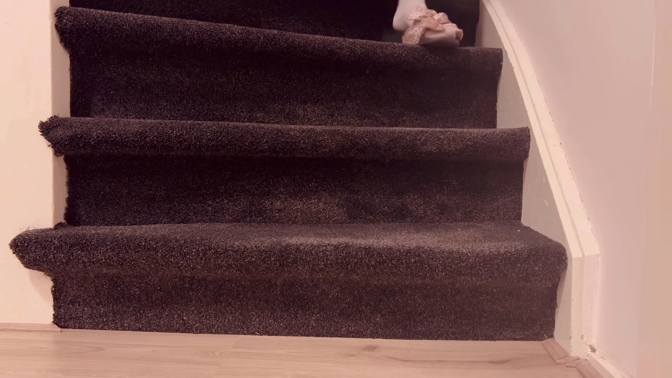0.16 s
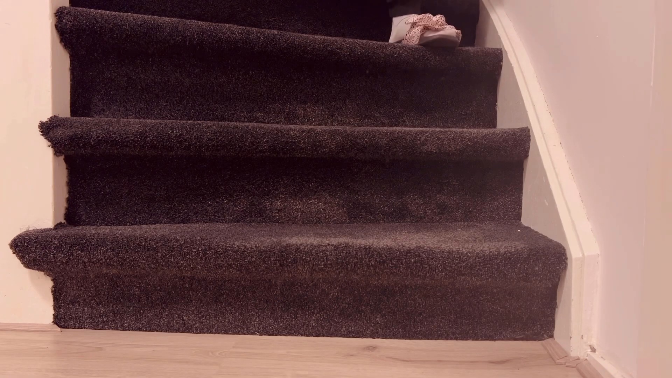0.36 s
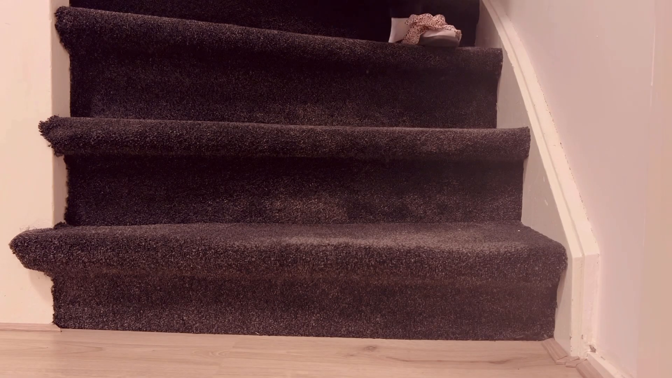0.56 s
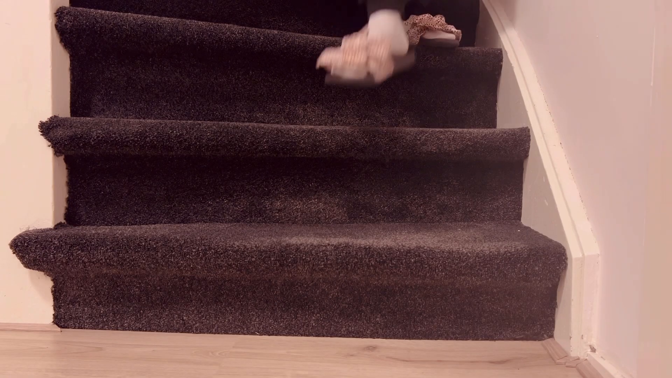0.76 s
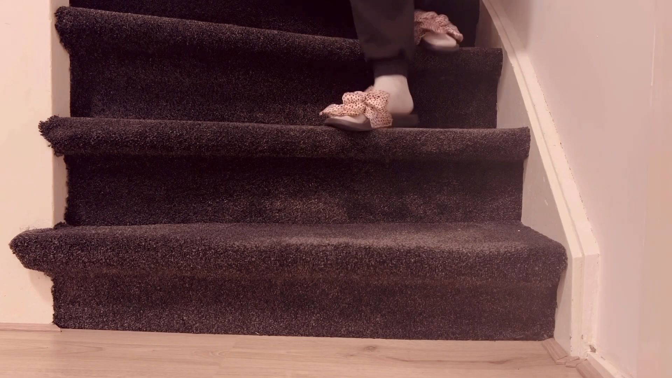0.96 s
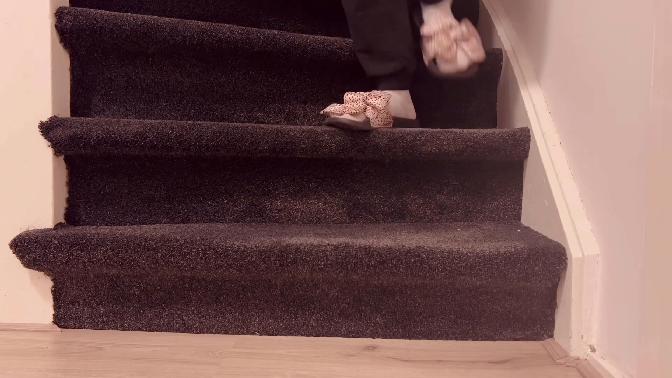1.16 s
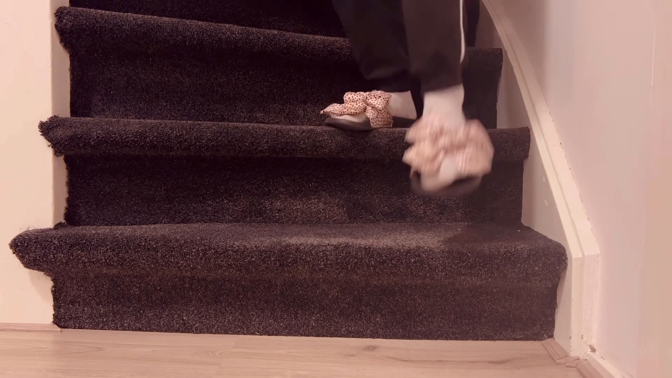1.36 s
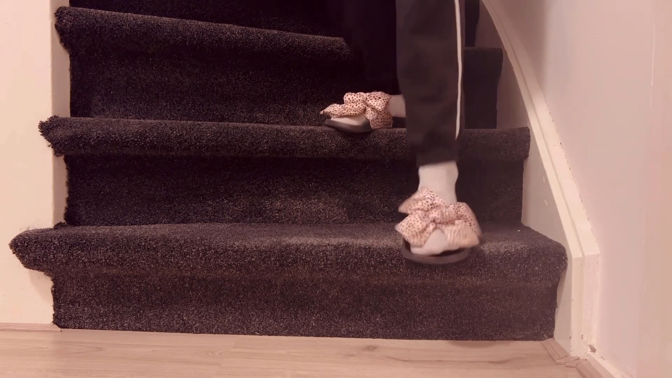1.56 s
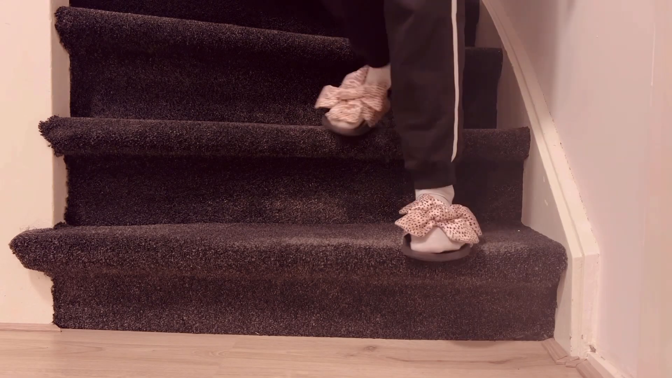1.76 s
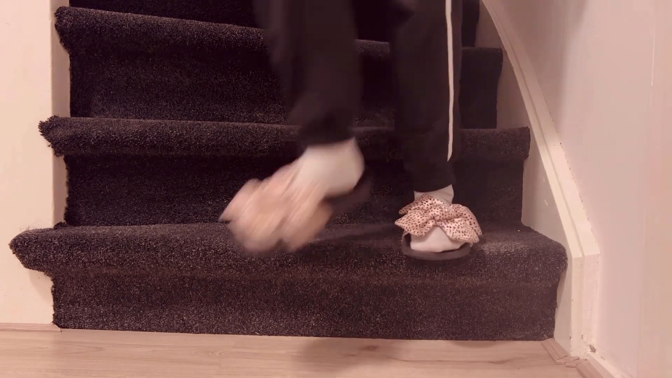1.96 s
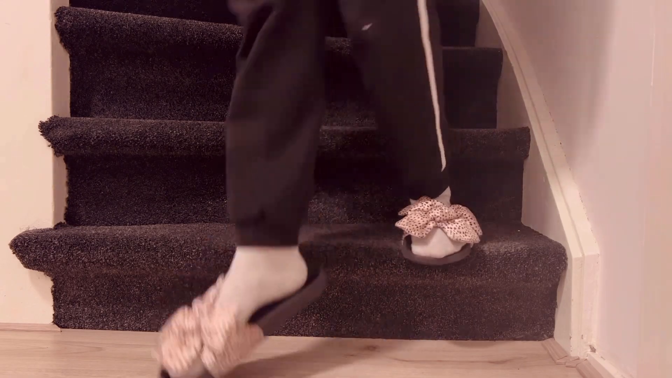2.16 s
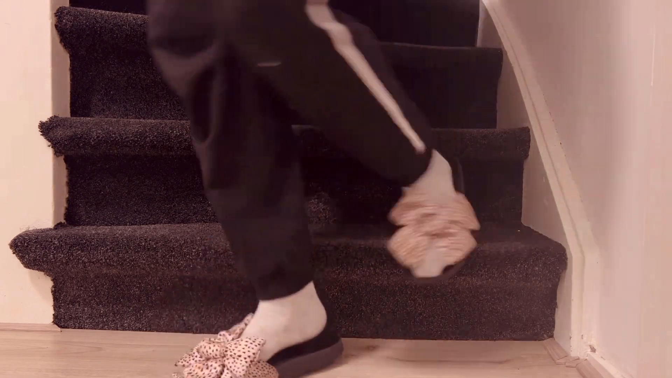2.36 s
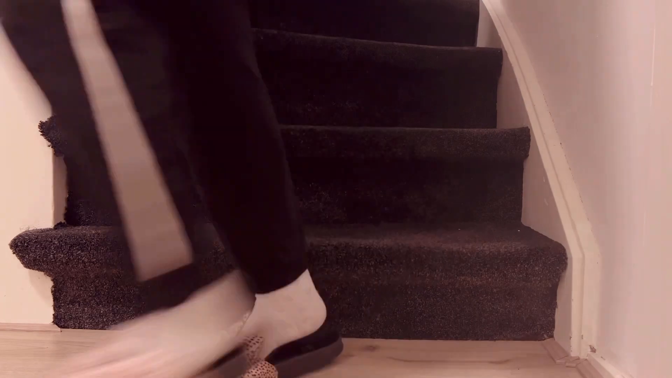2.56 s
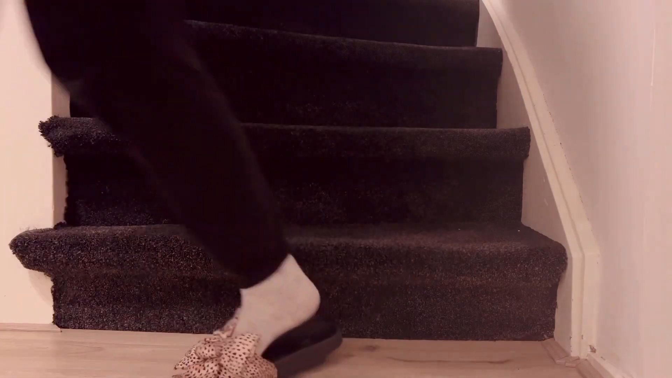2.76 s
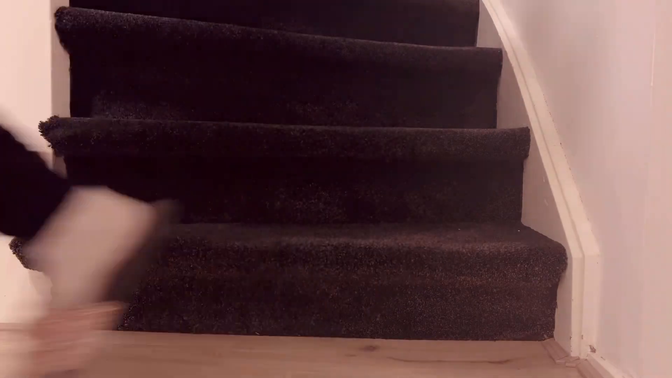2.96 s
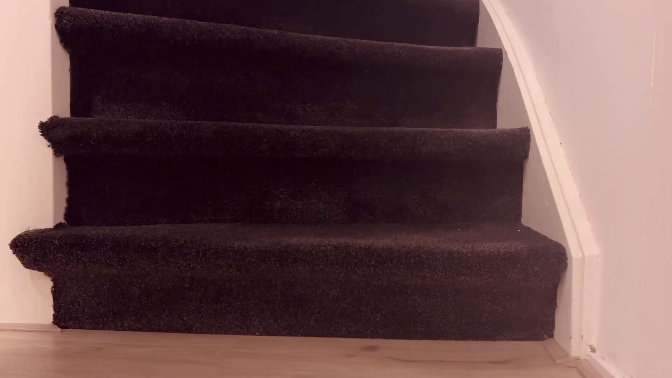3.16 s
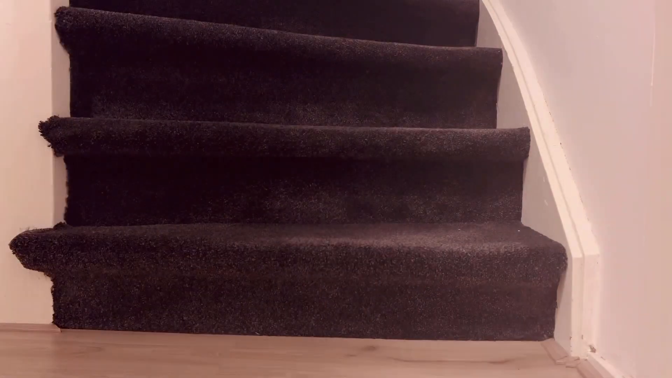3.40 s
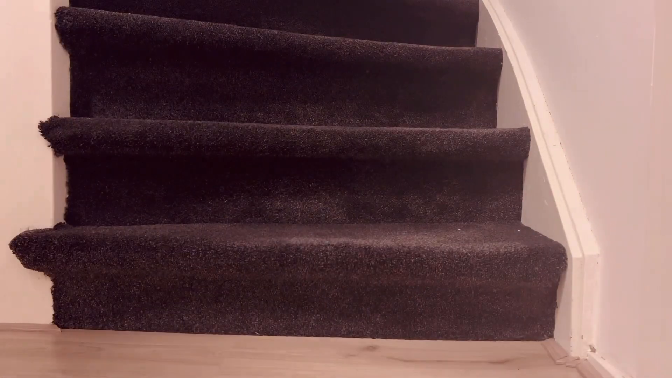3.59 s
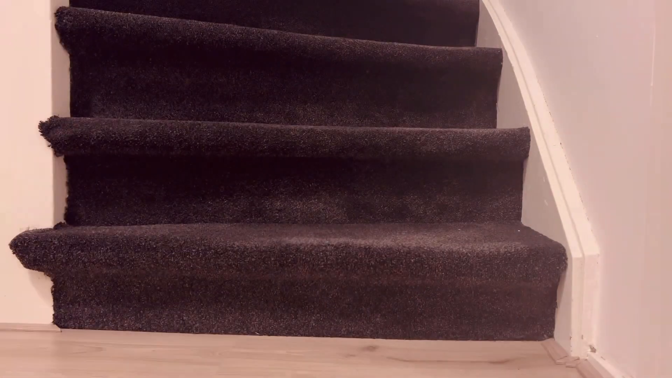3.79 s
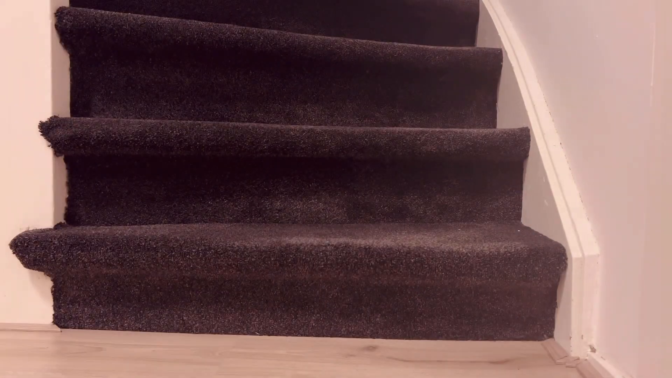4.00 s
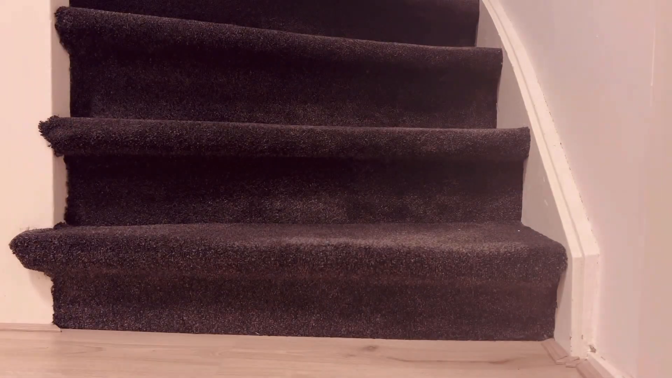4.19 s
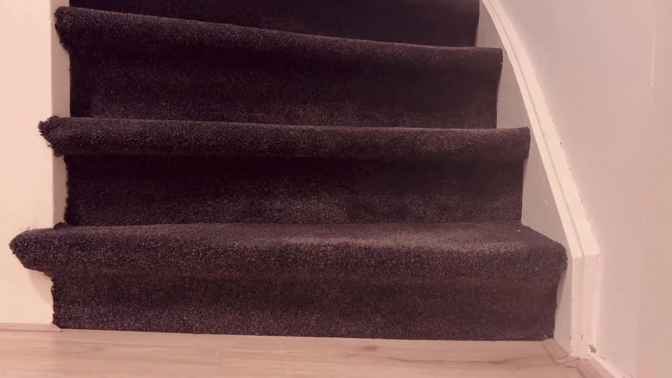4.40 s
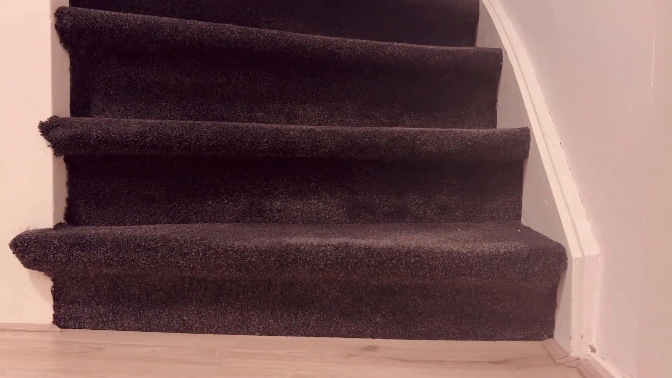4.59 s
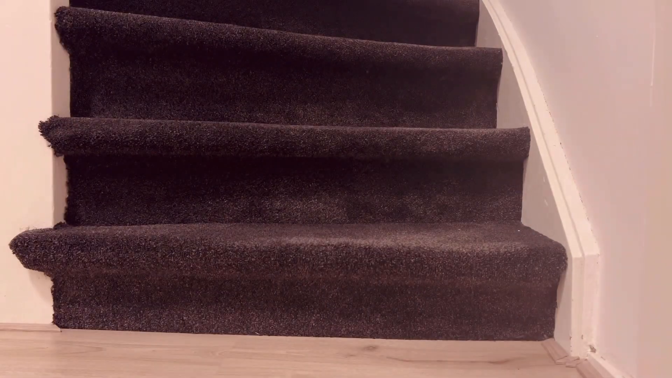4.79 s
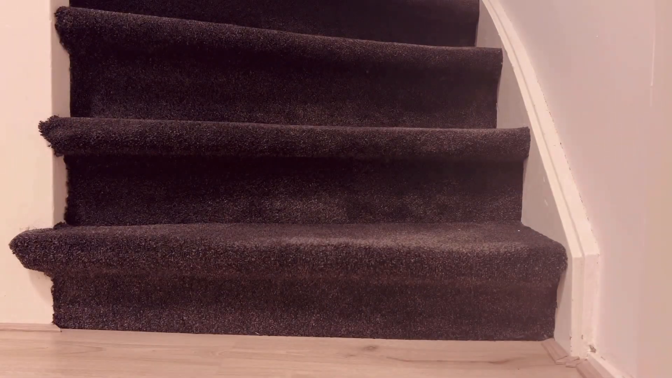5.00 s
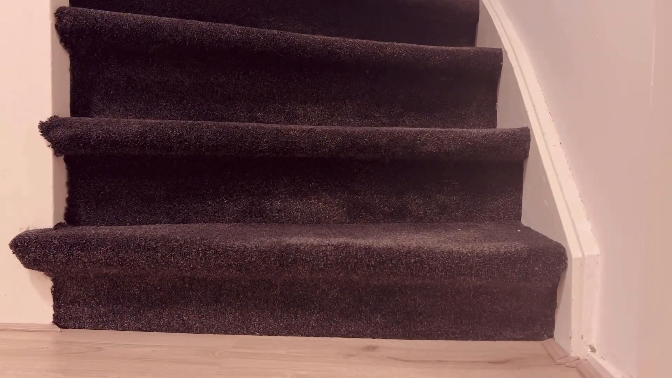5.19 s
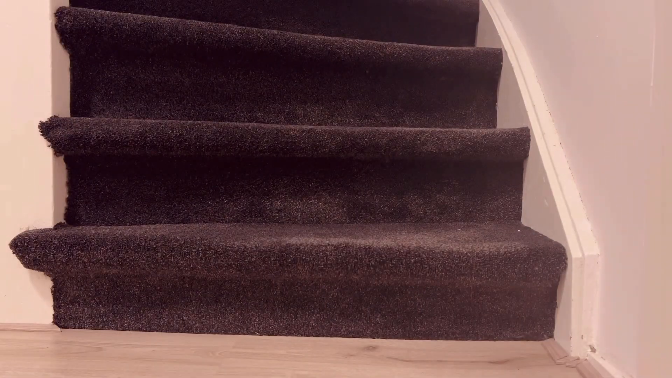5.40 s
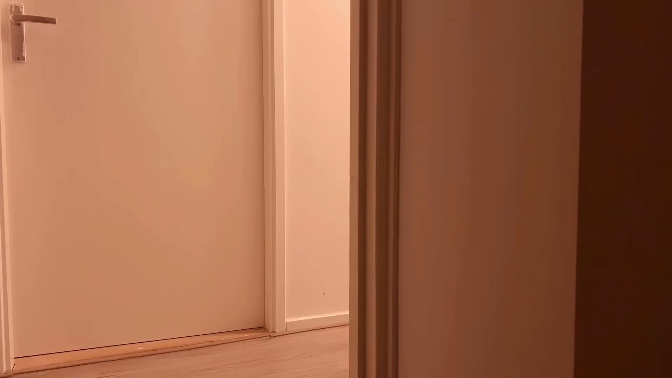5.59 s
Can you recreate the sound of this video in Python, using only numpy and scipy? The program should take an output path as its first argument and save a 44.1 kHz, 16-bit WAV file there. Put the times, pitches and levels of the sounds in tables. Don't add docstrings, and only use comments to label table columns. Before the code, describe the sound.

Dull booming steps descend a carpeted wooden staircase, followed by a sharp landing on bare boards and quieter footsteps receding down a hall.

```python
import sys
import numpy as np
from scipy import signal
from scipy.fft import rfft, irfft, next_fast_len
from scipy.io import wavfile
from scipy.ndimage import uniform_filter1d, map_coordinates

SR = 44100
rng = np.random.default_rng(int(sys.argv[2]) if len(sys.argv) > 2 else 0)


def invert_db(level):
    return 10 ** (np.asarray(level, dtype=float) / 20)


def waveform_to_disk(signal):
    frames = np.transpose(np.atleast_2d(signal))
    scaled = np.clip(frames, -1, 1) * 32767
    samples = np.round(scaled).astype(np.int16)
    wavfile.write(sys.argv[1], SR, samples)


N = 249149
LONG = next_fast_len(N, True)
PORT_LAG = 2


def rms_one(x):
    return x / np.sqrt(np.mean(x ** 2) + 1e-20)


def at_hz(points, hz):
    table = np.array(points)
    return np.interp(np.log(np.maximum(hz, 1)), np.log(table[:, 0]), table[:, 1])


def coloured(x, gain_db):
    return irfft(rfft(x) * invert_db(gain_db), x.shape[-1])


def stereo_noise(size):
    # hz, left-right likeness
    coherence = [(60, 0.95), (120, 0.98), (180, 0.84), (300, 0.81), (600, 0.18), (2000, 0.1), (5000, 0.33),
                 (10000, 0.056)]
    hz = np.fft.rfftfreq(size, 1 / SR)
    mid, side = rfft(rng.standard_normal((2, size)))
    alike = np.clip(at_hz(coherence, hz), 0, 1)
    return hz, np.sqrt(1 + alike) * mid + np.sqrt(1 - alike) * side * [[1], [-1]]


def panned(db):
    return invert_db(np.array([db / 2, -db / 2]))


def add(out, piece, s):
    at = int(s * SR)
    out[:, at:at + piece.shape[1]] += piece[:, :N - at]


def room_tone():
    # hz, level_db per Hz
    air_spectrum = [(15, -32), (25, -4), (53, 1.5), (75, -12.5), (107, -2.5), (167, -14.5), (237, -11.5),
                    (305, -25), (425, -21.5), (1100, -35.5), (1430, -64.5), (2420, -120)]
    # hz, level_db per Hz
    mic_spectrum = [(650, -32.5), (1100, -15), (1190, -8.5), (1330, -5.5), (1950, 0), (2230, 1),
                    (2700, -6.5), (3370, -5), (3570, -6), (3900, -8), (6750, -8), (8360, -8), (9500, -8.5),
                    (10100, -14), (11000, -18), (13000, -19), (13700, -22), (15300, -19.5), (15900, -39.5)]
    # hz, left_right_db
    mic_balance = [(1000, 0.5), (1400, 2.5), (2000, 7), (3500, 4.5), (4600, 2), (6000, -0.5)]
    # hz, rms_db
    mains = [(49.5, -76), (100, -75)]
    hz, spectra = stereo_noise(LONG)
    air = irfft(spectra * invert_db(at_hz(air_spectrum, hz)), LONG)[:, :N]
    mic = irfft(spectra * invert_db(at_hz(mic_spectrum, hz)), LONG)[:, :N]
    mic = irfft(rfft(mic, LONG) * panned(at_hz(mic_balance, hz)), LONG)[:, :N]
    t = np.arange(N) / SR
    hum = sum(invert_db(db) * np.sqrt(2) * np.sin(2 * np.pi * f * t) for f, db in mains)
    air = invert_db(-67.5) * air / np.std(air.mean(0))
    mic = invert_db(-83.5) * mic / np.std(mic.mean(0))
    return air + mic + hum


def booms():
    # start_s, peak_db, boom_hz, t60_s
    tread_loads = [(.03, -51, 86.7, 0.31), (.147, -28, 101.2, 0.11), (.2, -36.5, 109, 0.1),
                   (.261, -38, 62.3, 0.24), (.309, -44.5, 72.9, 0.26), (.382, -39, 74.5, 0.057),
                   (.45, -65, 58, 0.15), (.512, -43, 104.3, 0.088), (.6, -62, 65.4, 1),
                   (.726, -39.5, 82.5, 0.087), (.769, -40, 79.5, 0.049), (.857, -33.5, 102.9, 0.19),
                   (.92, -40, 65, 0.13), (.968, -44.5, 112.6, 0.14), (1.038, -47.5, 99, 0.29),
                   (1.079, -46.5, 81.6, 0.068), (1.128, -60, 61.5, 0.054), (1.423, -54, 101, 0.11),
                   (1.498, -52.5, 108.4, 0.62), (1.544, -27.5, 108.4, 0.18), (1.565, -23, 106.5, 0.28),
                   (1.637, -33, 76.8, 0.17), (1.687, -45, 80, 0.079), (1.743, -39.5, 70.8, 0.2),
                   (1.779, -48.5, 72, 0.19), (1.827, -46.5, 103.4, 0.13), (1.95, -61, 64.6, 0.19)]
    # start_s, peak_db, boom_hz, t60_s
    joist_loads = [(2.108, -61, 65, 0.083), (2.201, -44.5, 91.7, 0.49), (2.25, -53, 102, 0.17),
                   (2.319, -43.5, 123.5, 0.096), (2.711, -51, 123, 0.16), (2.752, -34, 80.4, 0.087),
                   (2.799, -50, 75, 0.21), (2.866, -49.5, 110, 0.13), (2.95, -59, 89, 0.61),
                   (3.31, -46.5, 61.5, 0.092), (3.408, -52, 60, 0.2), (3.487, -60, 103, 0.38),
                   (3.552, -56, 60.3, 0.2), (3.888, -55, 75.6, 0.12), (4.037, -57, 63.3, 0.2),
                   (4.23, -58, 81.4, 0.062), (4.39, -57.5, 86, 0.34), (4.432, -47, 90.5, 0.18),
                   (4.498, -57, 74, 0.47), (4.995, -55.5, 101.7, 0.29), (5.307, -55.5, 86.3, 0.4)]
    stairwell_hz, stairwell_t60_s = 49.58, 0.81
    settle_s, sways_per_s = 0.0072, 40
    rate = SR // 10
    out = np.zeros(N // 10 + rate)
    t = np.arange(rate // 2) / rate
    loads = tread_loads + joist_loads
    sway = rng.standard_normal((len(loads), 3, 40))

    def slow(v):
        return map_coordinates(v, [t * sways_per_s], order=3, mode="mirror")

    rise = (1 - np.exp(-t / settle_s)) * np.clip(10 * (.5 - t), 0, 1)
    for (s, db, hz, t60), (wobble, swell, other) in zip(loads, sway):
        air_db = -57 + (db + 45) - db
        shape = rise * invert_db(-60 * t / t60)
        phase = 2 * np.pi * hz * t + 0.55 * (slow(wobble) - wobble[0])
        tread = np.sin(phase) * invert_db(1.6 * slow(swell))
        tread += invert_db(-15.5 + 6.5 * np.clip(slow(other), -2, 1)) * np.sin(1.8 * phase)
        air = invert_db(air_db - 60 * t / stairwell_t60_s) * rise
        air = air * np.sin(2 * np.pi * stairwell_hz * t + 1.3 * slow(other))
        at = int(s * rate)
        out[at:at + len(t)] += invert_db(db) * (shape / shape.max() * tread + air)
    return np.tile(signal.resample_poly(out, 10, 1)[:N], (2, 1))


def scuff():
    # start_s, fall_20db_s, hiss_db, rub_re_hiss_db,
    # brightness_db
    skids = [(0.141, 0.15, -77, 7.5, -3.5), (0.718, 0.11, -74, -10, 0), (0.859, 0.33, -83, 7, -2),
             (1.438, 0.08, -68, 0, 0), (1.538, 0.4, -79.5, 7, 0), (1.657, -0.23, -72.5, -8, 7.5),
             (2.096, 0.32, -80.5, 13.5, 0), (2.202, 0.1043, -49.5, -6, 4), (2.232, 0.21, -72.5, -2, 2),
             (2.706, 0.18, -76, 11.5, -2), (3.271, 0.19, -83, 10, -5), (3.855, 0.15, -79, 8, -7),
             (3.965, 0, -76, 14, 0), (3.998, -0.12, -75.5, 10.5, 14), (4.989, 0.23, -76.5, -2, -4),
             (4.49, 0.25, -84, 5.5, -4), (5.12, 0.15, -90.5, 6.5, -3), (0.385, 0.02, -86, 7, -4)]
    # peak_s, fall_20db_s, hiss_db, rub_re_hiss_db, brightness_db
    flicks = [(0.379, 0.0551, -66.5, -9, 8), (.511, -0.13, -79, 2.5, -1), (0.898, 0.3, -79.5, -4, 0.5),
              (1.063, 0.03, -64, -4, 5.5), (1.749, -0.04, -66, -13, 3), (1.761, 0.03, -59.5, -9, 1),
              (1.788, 0.34, -81.5, -4.5, -2), (2.355, 0.06, -67, -0.5, 3), (2.775, 0.107, -56, -2, -3),
              (2.814, 0.2, -72.5, -5.5, 0.5), (4.028, 0, -61.5, -5.5, 10.5),
              (4.389, 0.25, -76, -24.5, -2.5), (4.41, 0.14, -70, -13, -9), (4.45, 0.1, -61, -11.5, -5.5)]
    # peak_s, rise_12db_s, fall_20db_s, hiss_db, brightness_db
    drags = [
        (2.75, 0.08, 0.13, -73.5, 0),
        (3.31, 0.06, 0.8, -81.5, -1.5),
        (3.39, 0.2, 0.15, -78.5, -3),
        (3.495, 0.2, 0.07, -76.5, 0),
        (3.95, 0.06, 0.15, -76, -1),
        (4.06, -0.06, 0, -81, -2),
        (4.559, 0.02, -0.06, -73, -1.5),
        (4.599, 0, -0.04, -72, 3),
        (5.3, 0.04, -0.03, -77, -7),
    ]
    # hz, level_db per Hz
    hiss_spectrum = [(1410, -43.5), (2400, -5), (4320, 0), (7830, -2), (9110, -3), (10400, -18.5),
                     (12500, -32), (13900, -30), (14900, -25), (15700, -24), (15900, -62.5)]
    # time_s, level_db
    low_edge = [(0, 5), (2.0, -1), (3.0, 2), (4.1, 0.5), (4.35, -6.5), (4.5, -2.5), (4.7, -1), (5.6, -14)]
    dulling, rub_lingers = 0.12, 0.12
    time, gains = np.arange(LONG) / SR, np.zeros((3, LONG))
    strokes = [(s, 0.0044, fall, db, rub, tilt) for s, fall, db, rub, tilt in skids]
    strokes += [(s, 0.015, fall, db, rub, tilt) for s, fall, db, rub, tilt in flicks]
    strokes += [(s, rise, fall, db, -2.5, tilt) for s, rise, fall, db, tilt in drags]
    for s, rise, fall, db, rub_db, tilt_db in strokes:
        rise, fall = max(rise, .002), max(fall, .015)
        near = slice(max(int((s - 3 * rise) * SR), 0), int((s + 3 * fall) * SR))
        below = np.maximum(12 * (s - time[near]) / rise, 20 * (time[near] - s) / fall)
        tilt = tilt_db - dulling * below
        gains[:, near] += invert_db(db - below + np.array([-tilt / 2, tilt / 2, rub_db + rub_lingers * below]))

    slips = np.minimum(rng.exponential(1, LONG // 60 + 1), 3)
    clumps = rms_one(uniform_filter1d(slips - 1, size=9))
    grains = invert_db(np.repeat(1.5 * slips + .9 * clumps, 60)[:LONG])
    hz, spectra = stereo_noise(LONG)
    noise = irfft(spectra, LONG) * grains
    hiss = rms_one(coloured(noise, at_hz(hiss_spectrum, hz) - 40 * (hz < 2400)))
    upper = coloured(hiss, -40. * (hz < 6300))
    lowest = coloured(hiss, -40. * np.clip((hz - 3300) / 2500, 0, 1))
    middle = hiss - upper - lowest * (1 - invert_db(np.interp(time, *np.transpose(low_edge))))
    rub_band = signal.butter(2, [650, 2500], "band", fs=SR, output="sos")
    rub = rms_one(signal.sosfilt(rub_band, noise[::-1, ::-1]))
    mix = gains[0] * middle + gains[1] * upper + gains[2] * rub
    return (panned(1.5)[:, None] * mix)[:, :N]


def wood(modes, luck, t, scale, rise, spread, pan_db, loudest_hz=None, focus_db=13):
    hz, db, t60 = np.tile(np.transpose(modes), 3)
    strength, detune, turn, phase = luck[:, :len(hz)]
    if loudest_hz:
        db = db - focus_db * np.log2(hz / loudest_hz) ** 2
    sign = np.tile((-1.) ** np.arange(len(modes)), 3)
    step = np.exp((2j * np.pi * hz * (1 + 0.058 * detune) - np.log(1000) / (t60 * scale)) / SR)
    rings = np.cumprod(np.broadcast_to(step, (len(t), len(hz))), axis=0)
    aimed = np.clip(hz / 280, 0, 1) ** 3
    angle = .5 * phase + np.outer([1, -1], aimed * spread * turn)
    start = sign * invert_db(db + 2.0 * strength) * np.exp(1j * angle) * panned(pan_db * aimed)
    both = (start @ rings.T).imag * (1 - np.exp(-t / rise)) ** 2
    return both / np.abs(both.mean(0)).max()


def knocks():
    # mode_hz, level_db, t60_s
    lower_wood = [(147, -12, 0.018), (190, -7, 0.09), (205, 2.5, 0.087), (231, 2, 0.072),
                  (272.8, -1.5, 0.13), (309.2, -0.5, 0.056), (341.1, 4, 0.054), (368, 1.5, 0.07),
                  (406, -8.5, 0.092), (440.5, -9.5, 0.048)]
    middle_wood = [(486, 1.5, 0.094), (540.7, -2, 0.042), (575, 10, 0.031), (624, 1, 0.065),
                   (705.3, -0.5, 0.095), (763, 2, 0.033), (814, -5, 0.036)]
    upper_wood = [(950, 9.5, 0.011), (920, 1.5, 0.0081), (1067, 3.5, 0.015), (1400, -11, 0.0096),
                  (1359, 8, 0.013), (1393, 10.5, 0.012), (1588, -16.5, .02), (1760, -3, 0.037),
                  (2000, -4.5, 0.014), (2330, -9, 0.02)]
    # start_s, peak_db, hardness_db, board_hz, ring_scale
    tread_contacts = [(.145, -34, -32.5, 198, 1.26), (.199, -45, -24, 156, 1.6),
                      (.388, -52, -13.5, 152, 1.7), (.409, -49, -11.5, 216, 1.23),
                      (.518, -48.5, -27.5, 220, 1.3), (.549, -66, -31, 240, 1.4),
                      (.735, -45.5, -27, 232, 0.66), (.777, -49, -28, 222, 0.3),
                      (.862, -35.5, -52, 186, 0.5), (.923, -54.5, -7, 190, 0.75),
                      (.946, -43.5, -49, 271, 0.76), (1.048, -48.5, -40.5, 151, 0.48),
                      (1.071, -50.5, -16.5, 171, 1.3), (1.439, -48, -25, 154, 0.42),
                      (1.459, -56.5, -18, 205, 18), (1.538, -36.5, -42, 266, 0.76),
                      (1.569, -42.5, -25, 153.5, 3), (1.612, -41, -36, 325, 0.66),
                      (1.659, -46, -33, 149, 1), (1.763, -46.5, -15.5, 354, 0.96),
                      (1.798, -64, -3, 151, 0.81)]
    # start_s, peak_db, hardness_db, board_hz, ring_scale
    landing_contacts = [(2.095, -45, -17, 374, 0.93), (2.101, -62, -11, 372, 0.68),
                        (2.126, -58.5, 7, 411, 0.83), (2.197, -25.5, 1, 433, 0.63),
                        (2.203, -24, -32, 360, 0.85), (2.238, -49.5, -13, 396, 3.7),
                        (2.319, -41, -10, 146, 0.81), (2.707, -30, -28, 316, 0.59),
                        (2.718, -40, -12, 372.5, 0.35), (2.752, -36.5, -8.5, 332, 1.22),
                        (2.76, -45, 3.5, 217, 0.62), (2.778, -46, -14, 209, 0.85),
                        (2.8, -47, 1.5, 147, 1.5), (2.872, -47, -19, 201, 0.46)]
    # start_s, peak_db, hardness_db, board_hz, ring_scale
    hallway_contacts = [(3.27, -38.5, -23, 246, 0.58), (3.309, -44.5, -15, 269, 0.49),
                        (3.358, -53, -16.5, 256, 1.7), (3.457, -47.5, -23.5, 198, 0.38),
                        (3.49, -56, -4.5, 182, 0.46), (3.853, -42.5, -23, 356, 1.3),
                        (3.889, -52, -7.5, 383, 1.14), (3.918, -53.5, -11, 327, 2.2),
                        (3.968, -56.5, -2, 315, 2.4), (4.377, -50, -22, 247, 0.87),
                        (4.402, -63, -12, 352, 2.1), (4.444, -58.5, -5, 353, 1.9),
                        (4.49, -59, -15, 313, 0.52), (4.986, -51.5, -0.5, 297, 1.03),
                        (5.019, -53, -2.5, 400, 0.91), (5.148, -65.5, -15, 226.5, 1),
                        (5.302, -50.5, -24, 230, 0.4), (5.318, -53, -25.5, 380, 0.75),
                        (5.518, -74, -7, 235, 1.9), (5.613, -73, -21, 231, 0.57)]
    # start_s, peak_db, hardness_db, board_hz, ring_scale
    toe_contacts = [(.145, -47, -16.5, 400, 0.57), (.722, -53, -19, 200, 0.95), (0.861, -73, -6, 400, 0.8),
                    (.935, -70, -3, 400, 1.9), (1.433, -62, -5, 400, 0.71), (1.537, -52, -9, 400, 0.49),
                    (1.565, -58, 4, 401, 0.39), (1.768, -54.5, 2, 396, 0.94), (2.704, -48, 2, 399, 0.41),
                    (3.267, -51.5, -6, 395, 0.61), (3.852, -60, -11, 399, .5), (4.374, -69, -14, 400, 0.62)]
    out, t = np.zeros((2, N)), np.arange(SR // 7) / SR
    contacts = tread_contacts + landing_contacts + hallway_contacts + toe_contacts
    luck = rng.standard_normal((len(contacts), 3, 4, 30))
    for (s, db, upper_db, board_hz, scale), (low, middle, high) in zip(contacts, luck):
        middle_db = -1 + 0.52 * upper_db + 1.5 * np.log2(board_hz / 230)
        rise = 0.00046 * invert_db(-.2 * upper_db - 0.25 * (db + 27))
        body = wood(lower_wood, low, t, scale, rise, spread=0.42, pan_db=-4.0, loudest_hz=board_hz)
        body += invert_db(middle_db) * wood(middle_wood, middle, t, scale, rise, spread=0.56, pan_db=2.0)
        body += invert_db(upper_db) * wood(upper_wood, high, t, scale, rise, spread=0.33, pan_db=1.5)
        add(out, invert_db(db) * body, s)
    return out


def causal(gain_db):
    cepstrum = irfft(gain_db * np.log(10) / 20)
    half = len(cepstrum) // 2
    cepstrum[1:half] *= 2
    cepstrum[half + 1:] = 0
    return np.exp(rfft(cepstrum))


def slaps():
    # start_s, peak_db, loudest_hz, left_right_db
    smacks = [(0.145, -71, 2860, -2), (1.4349, -56.5, 8640, -2), (1.537, -72, 2330, 4),
              (2.102, -63.5, 2319, -3), (2.1225, -63.5, 8500, 2.5), (2.1956, -34.5, 6130, 1.5),
              (2.7052, -67, 2240, -4), (2.752, -37, 4240, 3), (2.756, -42, 6400, 3), (2.7652, -43, 7400, 4),
              (2.778, -53.5, 2500, 7), (2.801, -67, 1940, 3), (0.895, -63, 8100, -1), (0.723, -76, 7800, 1),
              (1.4425, -62.5, 8030, 6), (2.128, -63.5, 2320, -4), (2.133, -68, 2500, -1),
              (4.449, -56, 4230, -5), (1.567, -72.5, 2000, -3), (2.2006, -44.5, 5100, -3),
              (2.7722, -49.5, 4400, 5), (2.774, -56.5, 2630, 3)]
    # hz, level_db per Hz
    sole_spectrum = [(1600, -2), (2900, -7), (3500, -19.5), (4200, 0.5), (4700, 1.5), (5400, -8.5),
                     (6400, -5), (7300, -11.5), (8200, -4), (9800, -8), (11500, -18.5), (13500, -24),
                     (15700, -28.5), (16600, -51)]
    out, t, hz = np.zeros((2, N)), np.arange(512) / SR, np.fft.rfftfreq(512, 1 / SR)
    for (s, db, peak_hz, pan_db), noise in zip(smacks, rng.standard_normal((len(smacks), 3, 512))):
        peak_db = 10.0 * np.exp(-(np.log2((hz + 1) / peak_hz) / 0.22) ** 2)
        push = 0.45 * (noise[0] + 0.32 * noise[1:])
        push = push * np.exp(-t / 0.001) * (1 - np.exp(-t / 0.00042))
        push[:, 22] += 1.1
        response = causal(at_hz(sole_spectrum, hz) + peak_db - 30 * (hz < 1600))
        slap = irfft(rfft(push) * response, 512) * (1 - t / t[-1])
        slap[1] = np.roll(slap[1], -PORT_LAG)
        add(out, slap / np.abs(slap).max() * invert_db(db + 8.0) * panned(pan_db)[:, None], s)
    return out


def ticks():
    # mode_hz, level_db, t60_s
    small_boards = [(527.7, 0.5, .03), (600, 0, 0.044), (669.6, 1, 0.05), (760, 0, .03), (850, 0.5, 0.022),
                    (950, 0.5, .02), (1039, -0.5, .02), (1188, 0, 0.015), (1318, 0, 0.011),
                    (1503, 0.5, .012), (1670, -0.5, .012), (1860, -0.5, 0.01193), (2182, 0.5, .015),
                    (2500, -0.5, 0.014)]
    # start_s, peak_db, board_hz, ring_scale
    board_ticks = [(.864, -56.5, 1350, 1.1), (.922, -57, 990, 1.3), (.932, -60, 640, 1.4),
                   (2.1972, -19, 1006, 0.24), (2.7052, -42, 850, 0.84), (2.1974, -25.5, 1600, 0.45),
                   (2.1005, -50, 2270, 1.6), (2.127, -54, 2230, 1.1), (.146, -66.5, 1100, 0.81),
                   (.158, -65, 1400, 1.1), (1.541, -65, 1050, 1.5), (1.56, -62, 1150, 1.4),
                   (1.545, -63, 2000, 1.5), (4.987, -61.5, 1580, .9), (5.02, -58.5, 1260, 2.1),
                   (2.207, -38, 1507, .9), (2.224, -49, 1302, .7), (2.708, -39, 624, 0.55),
                   (2.721, -52, 1100, .9), (.393, -60, 760, 1.1), (3.272, -57.5, 780, 1.1),
                   (3.281, -62, 1150, 0.83), (3.293, -57, 700, 1.1), (3.332, -69, 686, 1.2),
                   (3.397, -64.5, 650, 1.07), (3.855, -61, 910, .9), (3.866, -58.5, 1200, .9),
                   (3.881, -54, 800, .9), (3.895, -57.5, 720, .9), (3.91, -63, 696, 0.73),
                   (3.926, -61.5, 756, .9), (4.988, -47, 620, 2.5), (5.0, -52.5, 600, 1.5),
                   (5.043, -61, 700, 1.1), (5.073, -64, 550, .7), (5.09, -63.5, 560, 0.92),
                   (5.108, -72, 600, .7), (5.3, -68.5, 800, 1.1), (5.322, -72, 768, 1)]
    out, t = np.zeros((2, N)), np.arange(SR // 14) / SR
    for (s, db, board_hz, scale), luck in zip(board_ticks, rng.standard_normal((len(board_ticks), 4, 42))):
        tick = wood(small_boards, luck, t, scale, 0.00029, spread=0.21, pan_db=2.1,
                    loudest_hz=board_hz, focus_db=59.5)
        add(out, invert_db(db) * tick, s)
    return out


def hall():
    # hz, t60_s
    decay = [(100, 0.49), (300, 0.39), (1000, 0.28), (3000, 0.061), (8000, 0.17), (14000, 0.06)]
    # hz, level_db
    wall_colour = [(100, -1), (150, 2.5), (187, -4), (235, -6.5), (350, 0.5), (800, -1), (1500, 0.5),
                   (2500, 1.5), (5000, 0)]
    size = SR * 3 // 4
    hz, spectra = stereo_noise(size)
    spectra = spectra * invert_db(at_hz(wall_colour, hz))
    t = np.arange(size) / SR
    tail = np.zeros((2, size))
    for low in 40 * 2 ** np.arange(10.):
        octave = irfft(spectra * (hz >= low) * (hz < 2 * low), size)
        tail += octave * invert_db(-60 * t / at_hz(decay, 2 ** .5 * low))
    tail = tail * np.clip((t - .003) / 0.0082, 0, 1)
    return tail / np.sqrt(np.sum(tail ** 2) / 2)


def ports(dry):
    # hz, left_right_db
    port_balance = [(3500, 1.5), (4600, 3.5), (5600, 6.5), (6900, 6), (7600, 0.5), (8300, -2)]
    shared_from_hz, shared_likeness = 7400, 0.88
    in_step_hz, turn_hz = 8400, 3550
    hz = np.fft.rfftfreq(LONG, 1 / SR)
    pair = [dry[0] * invert_db(-.25), np.roll(dry[1], PORT_LAG) * invert_db(.25)]
    left, right = rfft(pair, LONG) * panned(at_hz(port_balance, hz) * (hz > 3000))
    share = shared_likeness * np.clip((hz - shared_from_hz) / 500 + .5, 0, 1)
    lead = np.exp(2j * np.pi * (hz - in_step_hz) / turn_hz)
    right = np.sqrt(1 - share ** 2) * right + share * left * lead
    return irfft([left, right], LONG)[:, :N]


def scene():
    # time_s, level_db
    echo_level = [
        (0, -8),
        (2.0, -9.5),
        (2.3, -9.5),
        (2.9, -7),
        (5.6, -2.5),
    ]
    low = booms()
    contact = knocks() + slaps() + scuff() + ticks()
    wet = invert_db(np.interp(np.arange(N) / SR, *np.transpose(echo_level)))
    sent = (wet * contact + invert_db(-13.0) * low).mean(0)[None]
    echoes = signal.fftconvolve(sent, hall(), axes=1)[:, :N]
    return low + contact + echoes + room_tone()


def low_pass(x):
    return signal.sosfilt(signal.butter(12, 16620, fs=SR, output="sos"), x)


def record(dry):
    roll_off = signal.butter(4, 45, "high", fs=SR, output="sos")
    heard = signal.sosfilt(roll_off, ports(dry))
    return low_pass(heard)


dry = scene()
out = record(dry)
waveform_to_disk(out)
```